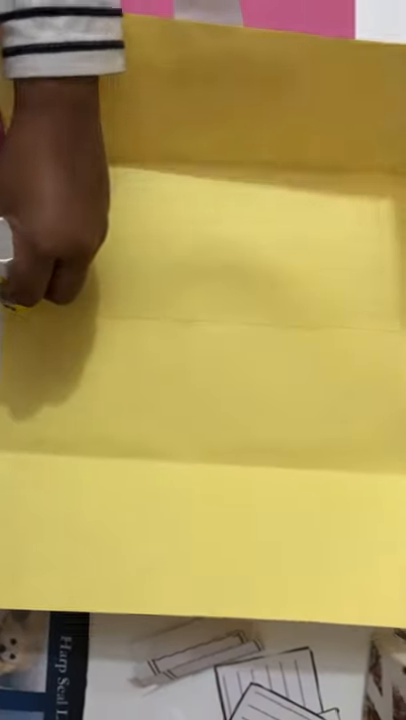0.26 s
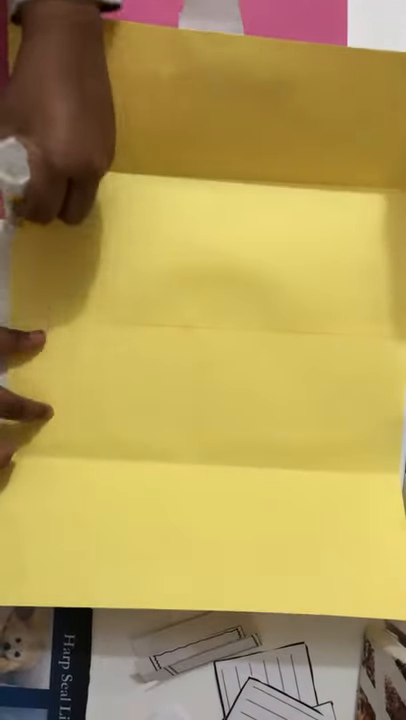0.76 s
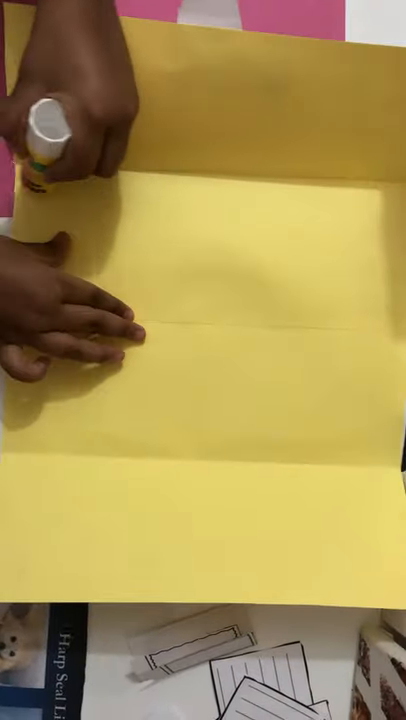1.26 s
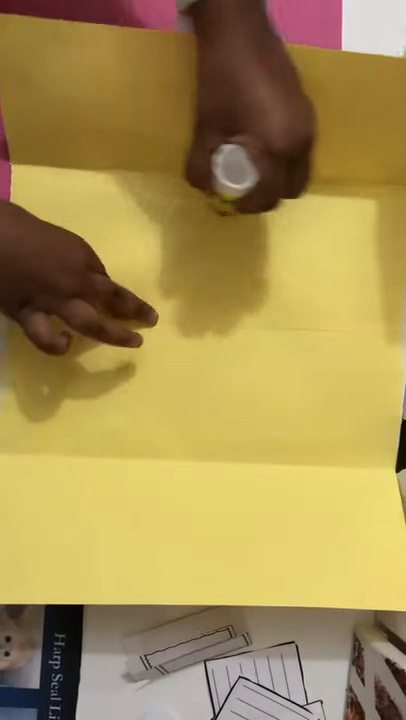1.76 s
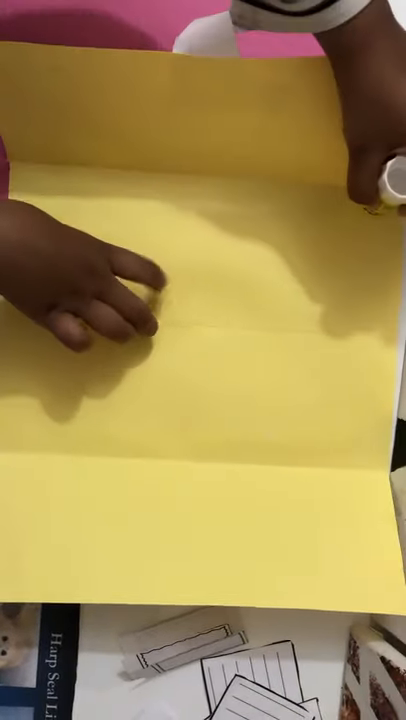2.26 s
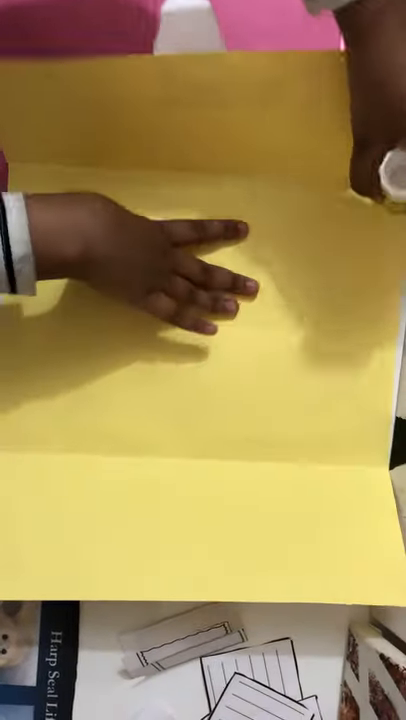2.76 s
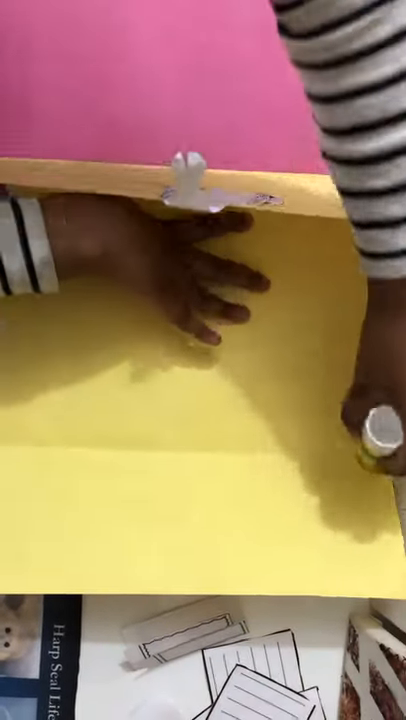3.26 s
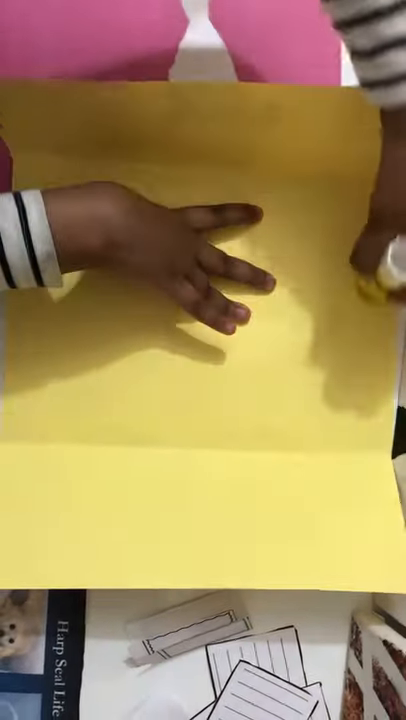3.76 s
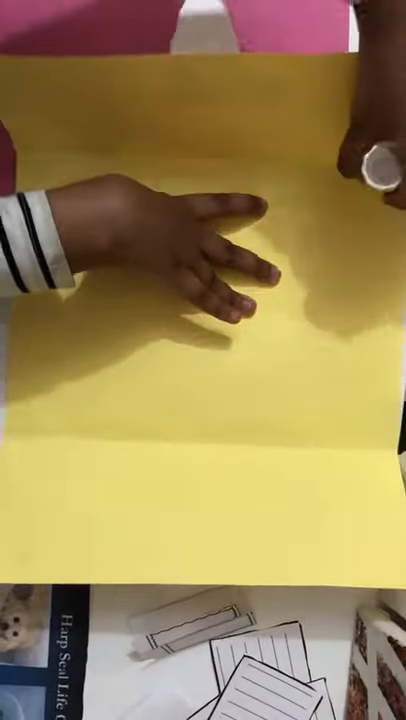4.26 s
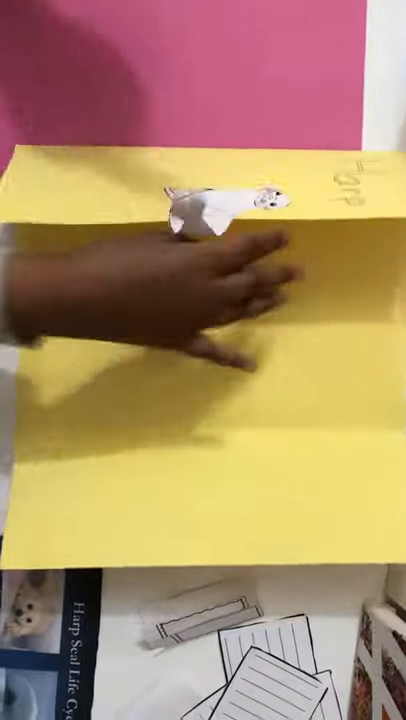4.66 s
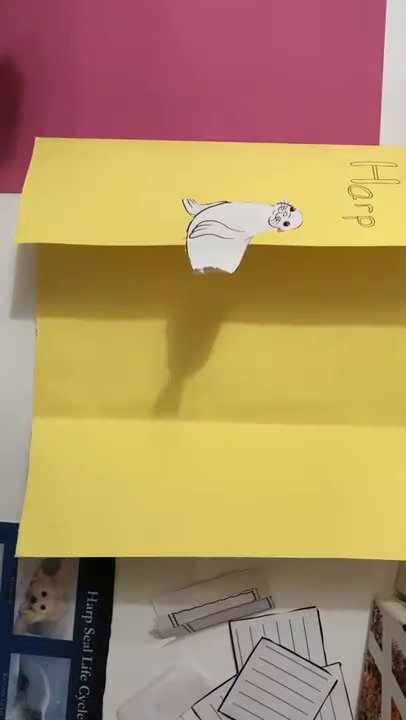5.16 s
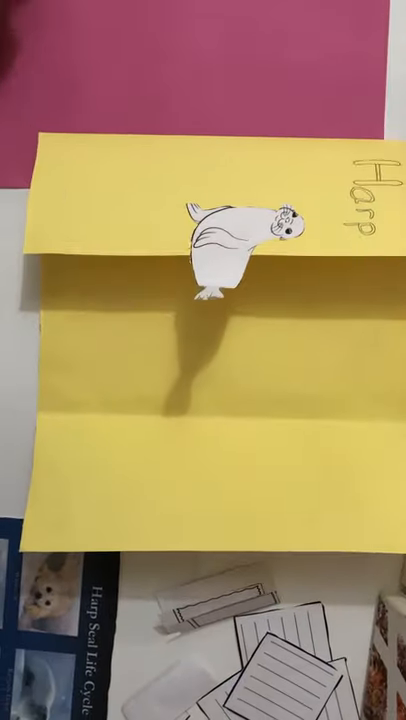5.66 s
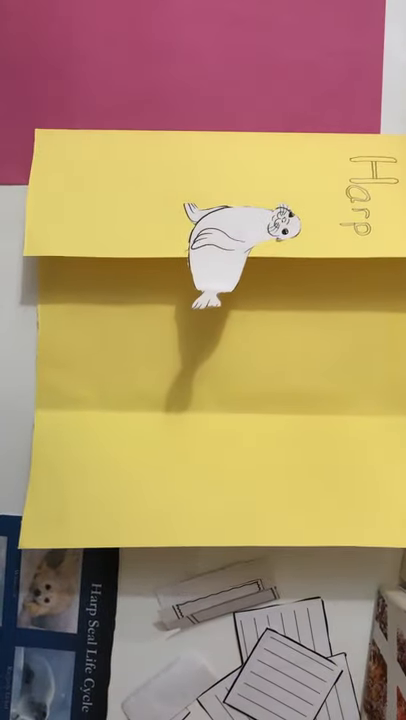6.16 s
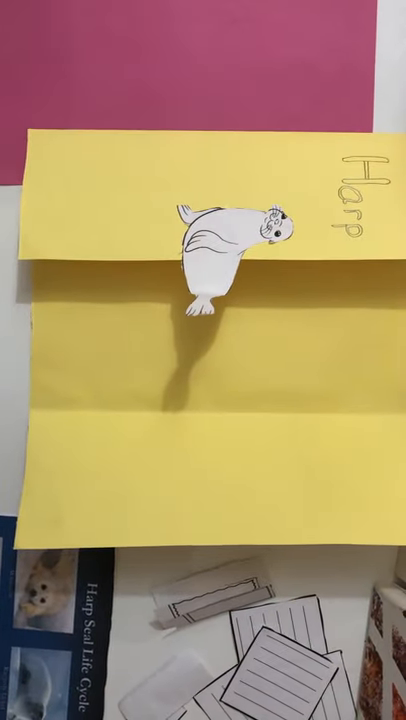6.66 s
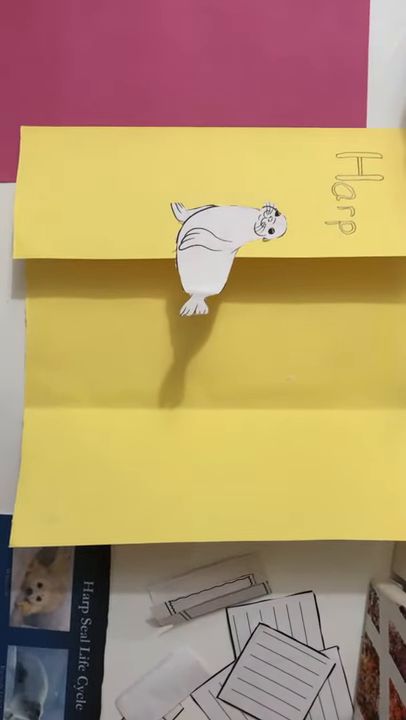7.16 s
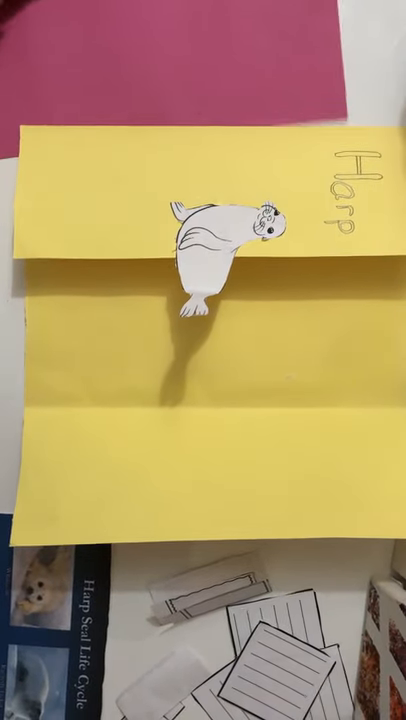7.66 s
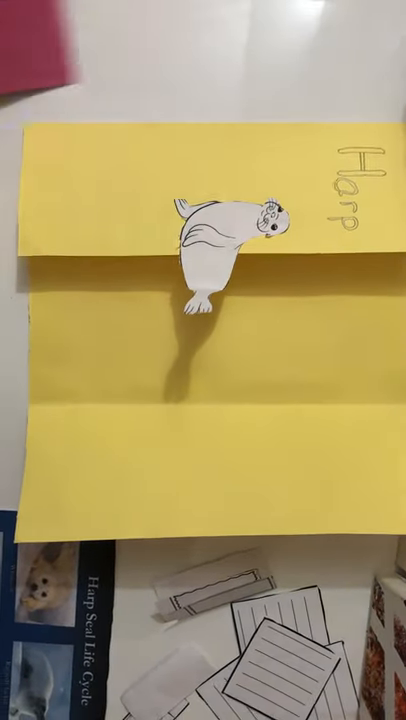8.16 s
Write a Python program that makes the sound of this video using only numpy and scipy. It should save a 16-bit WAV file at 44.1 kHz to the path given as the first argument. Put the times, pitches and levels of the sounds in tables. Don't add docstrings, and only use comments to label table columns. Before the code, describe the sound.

Close dry paper rubbing, crinkling and fingertip taps on a table thin into silence before a sharp hard knock and brief papery shuffling.

```python
import sys
import numpy as np
from scipy import signal
from scipy.fft import rfft, irfft, next_fast_len
from scipy.io import wavfile
from scipy.ndimage import uniform_filter1d, map_coordinates

SR = 44100
rng = np.random.default_rng(int(sys.argv[2]) if len(sys.argv) > 2 else 0)


def magnitude_from_level(level_db):
    exponent = np.asarray(level_db, float) / 20
    return 10 ** exponent


def put_to_file(sound):
    columns = np.atleast_2d(sound).T
    safe = np.clip(columns, -1, 1)
    whole_steps = np.round(safe * 32767)
    wavfile.write(sys.argv[1], SR, whole_steps.astype(np.int16))


N = 370440

# [f/Hz, level/dB per Hz]
AIR_SPECTRUM = [(18, -33), (30, -7), (108, -2.5), (152, 0.5), (203, -14.5), (318, -14.5), (372, -12),
                (581, -59), (1530, -58), (2100, -37), (6310, -35.5), (8870, -37), (15800, -40)]
# [f/Hz, width/Hz, level/dB]
HUM_BANDS = [(55.3, 4.6, -57), (100.6, 6.9, -58.5), (194, 8.9, -64), (6600, 130, -93.5), (8700, 170, -81)]

RUB_STROKES = [(0.072, -51.5, 0.052, 0.083), (0.175, -41.5, 0.055, 0.019), (0.21, -55, 0.091, 0.14),
               (0.464, -63, .1, 0.21), (0.79, -61.5, 0.25, .1), (0.836, -54, 0.044, 0.096),
               (0.958, -55, 0.04, 0.021), (1.195, -50, 0.029, 0.042), (1.23, -68.5, .03, .4),
               (1.6, -60.5, 0.51, 0.12), (1.66, -51.5, 0.061, 0.16), (1.75, -56.5, 0.16, 0.37),
               (1.846, -54, 0.12, 0.34), (2.03, -60.5, .2, 0.43), (2.132, -43, 0.0072, 0.037),
               (2.248, -51.5, 0.11, 0.052), (2.392, -52.5, .014, 0.22), (2.46, -49, 0.071, 0.015),
               (2.585, -60, 0.13, 0.043), (2.764, -65.5, 0.22, .3), (2.868, -57, 0.17, 0.037),
               (3.158, -69, 0.032, .5), (3.28, -68.5, 0.17, .2), (3.34, -64, .04, .02),
               (3.408, -62.5, .15, .04), (3.43, -67, .03, 0.43), (3.77, -57.5, 0.1, 0.24),
               (3.9, -64, 0.27, 0.067), (4.063, -69, 0.069, 0.5), (4.36, -57, 0.045, 0.2),
               (4.586, -66, 0.036, 0.27), (4.639, -55, 0.083, 0.096), (5.06, -67.5, 0.22, 0.17),
               (5.25, -74, .2, 0.18), (5.385, -63.5, 0.014, 0.078), (5.5, -70, .15, 0.07),
               (6.05, -69, 0.18, 0.18), (6.2, -77, .2, 0.12), (7.475, -64.5, 0.014, 0.34),
               (7.62, -59, 0.23, 0.33), (7.702, -52.5, .1, 0.09), (7.81, -57, .06, 0.52),
               (7.956, -55, 0.06, 0.13), (8.1, -54, 0.0091, 0.029), (8.31, -61, 0.098, 0.023),
               (8.399, -55, 0.0068, .1)]
# [t/s, rustle level/dB, rise/s, fall/s, table's share level/dB]
SHEET_FLAPS = [(0.001, -57.5, .01, .05, -10), (0.075, -45.5, 0.014, 0.045, -1),
               (0.162, -55, 0.063, 0.074, -15), (0.464, -65, 0.15, 0.091, 3), (0.83, -55, 0.23, 0.2, -17),
               (1.2, -61.5, 0.051, 0.094, 12), (1.66, -56.5, 0.056, .12, -2),
               (1.846, -53, 0.16, 0.35, -0.5), (2.158, -39.5, 0.031, 0.05, -3.5),
               (2.624, -49.5, 0.066, 0.072, 5), (2.763, -36, 0.0083, 0.03, -8),
               (2.868, -34.5, .05, 0.1, -6.5), (3.282, -60, .025, .04, -2), (3.345, -63, .02, 0.25, 1),
               (3.78, -55.5, 0.1, 0.34, -2.5), (4.062, -60.5, .012, 0.5, 5.5),
               (4.37, -41, 0.033, 0.073, 2.5), (4.64, -61, 0.046, 0.073, -4), (5.41, -52, 0.011, 0.1, 4.5),
               (6.23, -67.5, .2, .1, -7), (7.29, -54, 0.024, .02, -10), (7.774, -42.5, .012, 0.067, -6),
               (7.9, -57, 0.12, 0.5, -11), (8.185, -46.5, 0.05, 0.1, -11)]
# [t/s of most pressure, level/dB, rise/s, fall/s]
FILM_SIZZLES = [(1.5, -71, .3, 0.33), (1.68, -64, .15, .2), (1.8, -65, .2, .3), (1.98, -65, .2, .25),
                (2.05, -65, .03, .04), (2.14, -53, .015, 0.043), (2.24, -64, .1, 0.044),
                (5.07, -69, .15, 0.12), (7.7, -66, .2, 0.18), (7.98, -61, .15, .06), (8.055, -71, .04, .02),
                (8.13, -63, .008, 0.016)]
# [f/Hz, level/dB per Hz]
FIBRE_SPECTRUM = [(710, -10), (1200, -6.5), (1790, -1.5), (2370, -2.5), (3200, 0.5), (4060, -0.5),
                  (5200, -2), (6810, -2), (8920, -4), (15800, -17)]
# [f/Hz, level/dB per Hz]
SHEET_SPECTRUM = [(380, -27), (650, -6), (753, -2.5), (1280, -0.5), (1550, -1), (3000, -13), (4200, -26),
                  (7000, -62)]
# [f/Hz, level/dB per Hz]
TABLE_SPECTRUM = [(140, -4), (230, 3), (302, -7.5), (393, 1), (850, -9.5), (1100, -12), (1870, -120)]
# [f/Hz, level/dB per Hz]
FILM_SPECTRUM = [(5000, -36), (8000, -10), (10000, -3), (13000, 0), (15800, 0)]
# [f/Hz, width/Hz, level/dB]
BODY_MODES = [(397, 120, 3), (540, 51, 6.5), (730, 27, 2), (970, 330, 1.5), (1450, 120, -0.5),
              (1780, 310, 2.5), (3200, 100, 3.5), (3700, 250, 1.5), (4740, 330, 1.5), (5150, 530, 3)]

# [t/s, peak level/dB, pitch f/Hz]
CREASE_SNAPS = [(0.0526, -38.5, 2320), (0.069, -27, 7700), (0.142, -33.5, 3200), (0.456, -37.5, 6200),
                (0.4753, -43, 3240), (1.116, -42, 9120), (1.162, -38.5, 4060), (1.169, -32.5, 4000),
                (1.65, -38, 4660), (1.837, -44, 3270), (1.8912, -42, 5090), (1.9485, -42, 5060),
                (1.973, -39, 4790), (2.0467, -45, 5290), (2.1286, -42, 4480), (2.199, -37, 8210),
                (2.2438, -40, 4320), (2.386, -51, 5800), (2.4604, -28.5, 7500), (2.582, -37, 3220),
                (2.7219, -47, 3000), (2.791, -37.5, 9000), (2.849, -33, 4200), (3.8257, -39.5, 3250),
                (2.8327, -31, 1490), (4.345, -41, 5600), (4.356, -38, 3000), (4.396, -34.5, 4260),
                (4.629, -28, 5940), (4.6305, -33, 2330), (5.392, -30.5, 5500), (7.312, -31, 5000),
                (7.478, -40.5, 7800), (8.1264, -34, 4690), (7.767, -30, 1900), (7.8672, -39, 2600),
                (8.1015, -38, 1600), (8.107, -36, 1100), (8.183, -43, 5500), (8.296, -38, 4000)]
# [t/s, peak level/dB, pitch f/Hz]
FAINT_SNAPS = [(0.9438, -55, 3300), (2.5112, -46, 6470), (3.145, -51, 3960), (3.3812, -45, 3550),
               (3.5139, -49, 4970), (3.5814, -47.5, 2810), (3.6252, -52, 6440), (3.675, -49, 2280),
               (3.744, -50, 5300), (4.2133, -56, 2650), (4.256, -51, 8800), (4.58, -46, 2340),
               (4.912, -52, 8750), (4.974, -51, 2900), (5.3776, -58, 6010), (5.5908, -46, 2750),
               (5.7407, -44, 5500), (6.4058, -56, 6000), (6.667, -43, 8300), (6.7755, -49.5, 6400),
               (6.7935, -48, 8700), (6.9498, -48, 3000), (7.008, -52, 3730), (7.0712, -45.5, 2900),
               (7.116, -50, 7000), (7.137, -46, 6150), (7.1514, -49, 7090), (7.543, -44, 3170),
               (8.2277, -48, 2410), (8.2484, -42, 3780)]
# [t/s, peak level/dB, slap f/Hz, thump level/dB, crease snap level/dB]
FINGER_TAPS = [(0.068, -34.5, 1340, -10, -20), (0.093, -30.5, 1210, 3.5, 0), (1.85, -41, 746, -21, -15),
               (2.15, -32, 790, -12, -18), (2.562, -47, 1090, -8, -12), (2.586, -45.5, 1300, -3, -12),
               (2.608, -38.5, 730, -7, -23), (2.63, -40.5, 600, -7, -21), (2.832, -29.5, 730, -11.5, -18),
               (2.864, -27.5, 900, -9, -1), (3.34, -49.5, 630, 13, 7), (3.422, -42, 664, -8, -3),
               (3.469, -48, 673, -2.5, 0), (4.061, -42.5, 760, -3, -7), (4.093, -50, 607, -5, 5.5),
               (4.337, -46, 990, -6, -15), (4.359, -35, 1790, -22, -10), (4.365, -31.5, 905, -9.5, -12),
               (7.768, -36.5, 1800, -13, 3.5), (8.162, -44, 2070, -12, -4), (8.17, -41, 1250, -17, -8),
               (8.353, -56, 870, -15, -20)]
# [t/s, peak level/dB, slap
# f/Hz, thump level/dB, crease snap level/dB]
RIM_TAPS = [
    (1.198, -32, 820, -1, 7.5),
    (2.765, -34, 1100, -21, -14),
    (4.158, -41, 740, -16, -8),
    (5.401, -33, 850, -12, -24),
    (7.329, -20, 710, -8, -25),
]
# [t/s, level/dB, pitch f/Hz,
# rise and fall/s]
AIR_POCKETS = [(0.83, -59, 1400, .05), (1.9, -57.5, 713, 0.05), (3.82, -56, 580, 0.06),
               (4.18, -58, 540, 0.043), (1.665, -55, 5200, 0.054), (1.87, -57, 9000, .03),
               (7.795, -60, 1300, .04), (7.87, -57, 1500, .04), (8.3, -60, 2870, 0.0087),
               (8.36, -61.5, 840, 0.026), (2.62, -50, 730, .03), (4.075, -54, 564, 0.027),
               (3.1, -50, 225, .04), (4.348, -58, 5230, .012), (4.64, -58, 1100, .03)]
# [t/s, peak level/dB, centre f/Hz, spread/s per root of a period]
BENDING_BLOWS = [
    (5.3915, -26, 430, .14),
    (1.196, -34, 450, .1),
    (7.2962, -12, 420, .11),
]

# [t/s, peak level/dB, low mode level/dB, crease snap level/dB]
TUBE_ROCKS = [(5.2, -52.5, -14, -16), (7.78, -42.5, -7, -15), (7.868, -39.5, -10, 6.5),
              (7.93, -45.5, -1, -8), (7.949, -44, 3.5, -8), (8.002, -40.5, -11, -1), (8.059, -40, -9, -2),
              (8.1, -39, 1, 5), (8.14, -50, 8.5, -10), (8.169, -38, -4.5, -3), (8.24, -52.5, 0.5, -10),
              (7.834, -45, -10, -10)]
# [f/Hz, width/Hz, level/dB]
TUBE_MODES = [(388.5, 80, 1), (894, 190, -2.5), (1420, 280, -2.5), (2020, 510, -4.5)]
# [f/Hz, level/dB, t60/s]
KNOCK_MODES = [(132.6, -13, 0.39), (187.2, -9.5, 0.44), (231, -8.5, 0.18), (266.6, -7.5, 0.23),
               (317, -3, 0.13), (364.7, 3, 0.14), (414, 1, 0.17), (511.3, -6, 0.2), (651, -7.5, 0.26),
               (682, -16.5, 0.36), (814, -8, 0.19), (920, -2, 0.094), (984, -3, 0.11), (1240, -16, 0.1),
               (1388, -3, 0.069), (1430, -1.5, .1), (1587, -10, 0.11), (1740, -7.5, 0.048),
               (3010, -0.5, 0.02), (3600, -30, .02), (5090, 5.5, 0.0078)]
# [f/Hz, level/dB per Hz]
CRACK_SPECTRUM = [(530, -33), (900, -2), (1590, 3.5), (2390, -25), (2960, -12.5), (3590, -25), (5100, -19),
                  (14700, -27), (16000, -51)]
# [f/Hz, level/dB per Hz]
WASH_SPECTRUM = [(450, -29), (700, 6.5), (1200, 0), (1850, -1), (2000, -22), (3600, -12.5), (6000, -29),
                 (15000, -53)]
# [f/Hz, t60/s]
ROOM_DECAY = [(150, 0.99), (500, 0.29), (1700, 0.29), (2500, 0.18), (10000, 0.085)]

KNOCK_S, KNOCK_DB = 7.2965, -11
DRAG_RUSTLE_DB, DRAG_RUMBLE_DB = -15.5, -19
TABLE_LAG_S, TABLE_LINGERS = 0.017, 1.04
STROKE_ROUND, FLAP_ROUND = 1.11, 1.12
CRISP_HZ, CRISP_DIES = 1700, 0.43
SNAP_T60_S, TICK_T60_S = 0.057, 0.058
TAP_SNAP_HZ, TAP_SNAP_LEAD_S = 2360, 0.002
CRACKLE_PER_S, CRACKLE_OVER_DB, CRACKLE_HZ = 35, 9, 4300
SOFT_THUMP_HZ, SOFT_T60_S = 199, 0.27
HARD_THUMP_HZ, HARD_T60_S = 376, 0.19
POCKET_WIDTH = 0.11
BEND_WIDTH, BEND_SLOPE, BEND_T60_S, BEND_RATTLE = 1.8, 1.5, 0.035, 0.09
ROCK_ATTACK_S, ROCK_T60_S = 0.0017, 0.11


def unit(x):
    return x / np.sqrt(np.mean(x ** 2) + 1e-20)


def decay(t, t60):
    return magnitude_from_level(-60 * t / t60)


def along(points, hz):
    f, v = np.transpose(points)
    return np.interp(np.log(hz + 1), np.log(f + 1), v)


def filtered(x, response):
    m = next_fast_len(len(x) + 4096)
    return irfft(rfft(x, m) * response(np.fft.rfftfreq(m, 1 / SR)), m)[:len(x)]


def peak(hz, width_hz):
    return lambda f: 1j * f * width_hz / (hz * hz - f * f + 1j * f * width_hz)


def body(hz):
    modes = [(magnitude_from_level(db) - 1) * peak(centre_hz, width_hz)(hz) for centre_hz, width_hz, db in BODY_MODES]
    return 1 + sum(modes)


def coloured_noise(length, spectrum):
    return unit(filtered(rng.standard_normal(length), lambda hz: magnitude_from_level(along(spectrum, hz))))


def wobble(rate):
    knots = rng.standard_normal(int(N * rate / SR) + 4)
    return map_coordinates(knots, [np.arange(N) * rate / SR])


def add(track, s, x):
    i = round(s * SR)
    track[i:i + len(x)] += x[:len(track) - i]


def swell(s, db, rise, fall, roundness=STROKE_ROUND):
    late = np.arange(0, N / SR, 1 / 1000) - s
    span = np.where(late < 0, rise, fall)
    return magnitude_from_level(db - 20 * abs(late / span) ** roundness)


def together(gains):
    total = np.sqrt(sum(g ** 2 for g in gains))
    return np.interp(np.arange(N), np.linspace(0, N, len(total), endpoint=False), total)


def burst(hz, spread, t60, attack, blow):
    t = np.arange(int(min(t60, 0.4) * SR)) / SR
    fall = 0.27 * decay(t, t60) + decay(t, 0.28 * t60)
    push = rng.standard_normal(len(t)) * fall * (1 - np.exp(-t / attack))
    push[0] = blow * np.sqrt(SR / hz)
    ring = peak(hz, spread * hz)
    x = filtered(push, lambda f: ring(f) ** 2)
    return x / abs(x).max()


def background():
    bands = np.zeros(N)
    for hz, width_hz, db in HUM_BANDS:
        bands += magnitude_from_level(db) * unit(filtered(rng.standard_normal(N), peak(hz, width_hz)))
    air = coloured_noise(N, AIR_SPECTRUM)
    return magnitude_from_level(-62 + 0.78 * wobble(7.5)) * air + bands


def friction(spectrum, patchy_db, gritty_db):
    grit = magnitude_from_level(gritty_db * (wobble(500) + 0.7 * wobble(70)))
    z = signal.stft(grit * rng.standard_normal(N), nperseg=512)[2]
    field = uniform_filter1d(rng.standard_normal(z.shape), size=4, axis=0)
    field = uniform_filter1d(field, size=14, axis=1)
    x = signal.istft(z * magnitude_from_level(patchy_db * unit(field)), nperseg=512)[1][:N]
    return unit(filtered(x, lambda hz: magnitude_from_level(along(spectrum, hz)) * body(hz)))


def flapping(strokes, lag, lasts, shared, drag_db):
    gains = [swell(s + lag, db + shared * share_db, rise + lag, lasts * fall, FLAP_ROUND)
             for s, db, rise, fall, share_db in SHEET_FLAPS]
    return together(gains + [magnitude_from_level(drag_db) * g for g in strokes])


def rubbing(strokes):
    hiss = friction(FIBRE_SPECTRUM, patchy_db=2.4, gritty_db=2.4)
    rustle = friction(SHEET_SPECTRUM, patchy_db=2.6, gritty_db=3.4)
    rumble = friction(TABLE_SPECTRUM, patchy_db=1.2, gritty_db=1.5)
    film = friction(FILM_SPECTRUM, patchy_db=2.2, gritty_db=2.6)

    dull = filtered(rustle, lambda hz: 1 / (1 + (hz / CRISP_HZ) ** 2))
    crisp = rustle - dull
    sheet = flapping(strokes, 0, 1, 0, DRAG_RUSTLE_DB) * dull
    sheet += flapping(strokes, 0, CRISP_DIES, 0, DRAG_RUSTLE_DB) * crisp
    table = flapping(strokes, TABLE_LAG_S, TABLE_LINGERS, 0.98, DRAG_RUMBLE_DB) * rumble
    sizzle = together([swell(*row) for row in FILM_SIZZLES]) * film
    return sizzle + together(strokes) * hiss + magnitude_from_level(-5) * (sheet + table)


def snap(track, s, db, hz, t60):
    add(track, s, magnitude_from_level(db - 5.5) * burst(hz, spread=1.28, t60=t60, attack=0.00027, blow=0.87))


def snaps(pressure):
    track, chance = np.zeros(N), np.zeros(N)
    for s, db, hz in CREASE_SNAPS:
        snap(track, s, db, hz, SNAP_T60_S)
    for s, db, hz in FAINT_SNAPS:
        snap(track, s, db, hz, TICK_T60_S)
    for s, db, *_, snap_db in FINGER_TAPS + RIM_TAPS + TUBE_ROCKS:
        snap(track, s - TAP_SNAP_LEAD_S, db + snap_db, TAP_SNAP_HZ, SNAP_T60_S)
    add(track, KNOCK_S, magnitude_from_level(-26) * burst(2930, spread=0.12, t60=0.022, attack=0.00027, blow=0.89))
    for when, size, pitch in rng.random((int(CRACKLE_PER_S * N / SR), 3)):
        hz = CRACKLE_HZ * 2 ** (2 * pitch - 1)
        snap(chance, when * N / SR, CRACKLE_OVER_DB - 12 * size, hz, TICK_T60_S)
    return track + chance * pressure


def taps():
    track = np.zeros(N)
    kinds = ((FINGER_TAPS, SOFT_THUMP_HZ, SOFT_T60_S), (RIM_TAPS, HARD_THUMP_HZ, HARD_T60_S))
    for rows, thump_hz, t60 in kinds:
        for s, db, hz, thump_db, _ in rows:
            slap = burst(hz, spread=0.87, t60=t60, attack=0.00039, blow=1.66)
            thump = burst(thump_hz, spread=0.6, t60=1.41 * t60, attack=0.0022, blow=1.66)
            lowest = burst(128.5, spread=0.7, t60=0.5, attack=0.0042, blow=1.12)
            add(track, s, magnitude_from_level(db - 5) * slap)
            add(track, s + 0.0015, magnitude_from_level(db + thump_db) * thump)
            add(track, s + 0.0031, magnitude_from_level(db + thump_db - 6) * lowest)
    return filtered(track, body)


def pockets():
    track, t = np.zeros(N), np.arange(-SR // 5, SR // 5) / SR
    for s, db, hz, span in AIR_POCKETS:
        ring = peak(hz, POCKET_WIDTH * hz)
        breath = unit(filtered(rng.standard_normal(len(t)), lambda f: ring(f) ** 2))
        add(track, s + t[0], magnitude_from_level(db - 20 * abs(t / span) ** STROKE_ROUND) * breath)
    return track


def bends():
    track, t = np.zeros(N), np.arange(SR // 10) / SR
    for s, db, hz, spread in BENDING_BLOWS:
        push = BEND_RATTLE * rng.standard_normal(len(t)) * decay(t, BEND_T60_S)
        push[0] = -1
        ring = peak(hz, BEND_WIDTH * hz)
        x = filtered(push, lambda f: np.exp(-4j * np.pi * spread * np.sqrt(f)) * abs(ring(f)) ** BEND_SLOPE)
        add(track, s, magnitude_from_level(db) * x / abs(x).max())
    return track


def tube():
    track, t = np.zeros(N), np.arange(SR // 4) / SR
    for s, db, low_db, _ in TUBE_ROCKS:
        scrape = rng.standard_normal(len(t)) * decay(t, ROCK_T60_S) * (1 - np.exp(-t / ROCK_ATTACK_S))
        modes = []
        for hz, width_hz, mode_db in TUBE_MODES:
            mode = filtered(scrape, lambda f: peak(hz, width_hz)(f) ** 2)
            modes.append(magnitude_from_level(mode_db) * mode / abs(mode).max())
        add(track, s, magnitude_from_level(db - 6.5) * (magnitude_from_level(low_db) * modes[0] + sum(modes[1:])))
    return track


def knock():
    track, t = np.zeros(N), np.arange(SR // 2) / SR
    ring = np.zeros(len(t))
    for hz, db, t60 in KNOCK_MODES:
        smear = unit(filtered(rng.standard_normal(len(t)), peak(hz, 39)))
        mode = 1.03 * np.sin(2 * np.pi * hz * t) + 0.34 * smear
        ring += magnitude_from_level(db) * decay(t, t60) * (1 - np.exp(-t * hz)) * mode
    crack = coloured_noise(len(t), CRACK_SPECTRUM)
    crack *= magnitude_from_level(12) * decay(t, 0.016) * (1 - np.exp(-(t / 0.0013) ** 2))
    wash = coloured_noise(len(t), WASH_SPECTRUM)
    wash *= magnitude_from_level(-15.5) * decay(t, 0.28) + magnitude_from_level(-26.5) * decay(t, 0.66)
    wash *= 1 - np.exp(-(t / 0.0103) ** 2)
    blow = ring + crack + wash
    add(track, KNOCK_S, magnitude_from_level(KNOCK_DB) * blow / abs(blow).max())
    return track


def room(x, delay):
    hz, t, z = signal.stft(rng.standard_normal(SR // 2), SR, nperseg=256)
    fading = z * decay(t, along(ROOM_DECAY, hz)[:, None])
    tail = signal.istft(fading, SR, nperseg=256)[1]
    late = np.pad(x, (int(delay * SR), 0))
    return signal.fftconvolve(late, tail / np.linalg.norm(tail))[:N]


def scene():
    strokes = [swell(*row) for row in RUB_STROKES]
    paper = rubbing(strokes) + snaps(together(strokes)) + pockets()
    table = taps() + bends() + tube()
    cap = knock()
    walls = magnitude_from_level(-16.5) * room(paper, delay=0.009)
    walls += magnitude_from_level(-15.5) * room(table, delay=0.012)
    walls += magnitude_from_level(-19.5) * room(cap, delay=0.011)
    return (paper + table + cap + walls + background())[None]


def top_cut(x):
    return signal.sosfilt(signal.butter(12, 16510, fs=SR, output="sos"), x)


def record(dry):
    mic = lambda hz: (1j * hz / (38 + 1j * hz)) ** 4 / (1 + (hz / 15900) ** 60)
    mix = filtered(dry[0], mic)[None]
    return top_cut(mix)


dry = scene()
out = record(dry)
put_to_file(out)
```